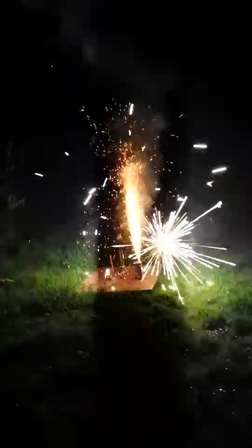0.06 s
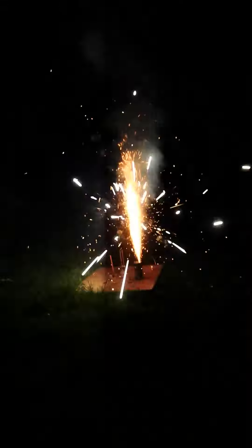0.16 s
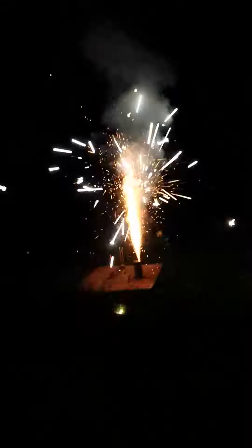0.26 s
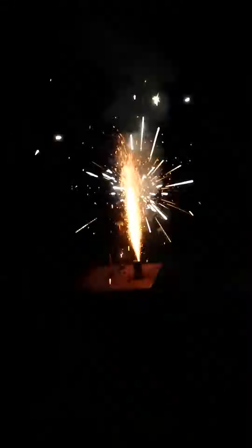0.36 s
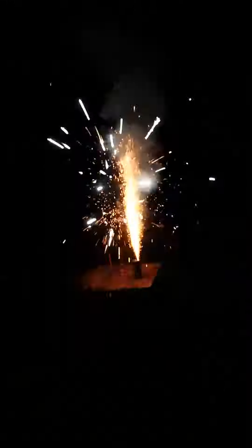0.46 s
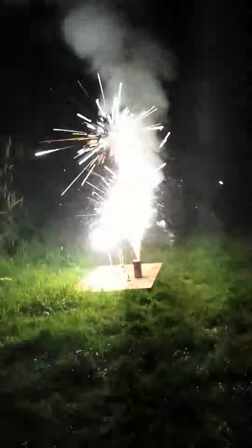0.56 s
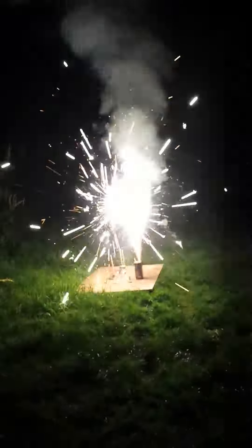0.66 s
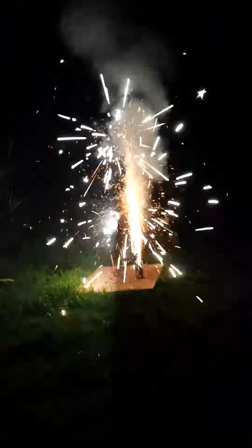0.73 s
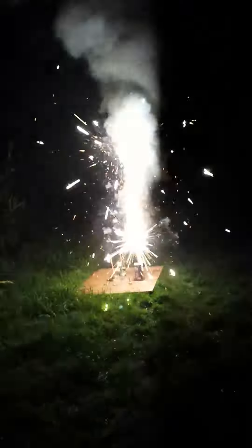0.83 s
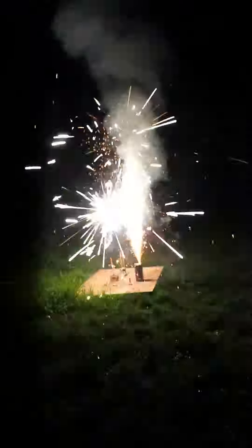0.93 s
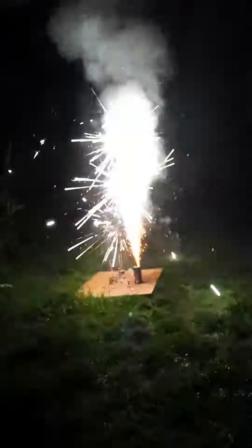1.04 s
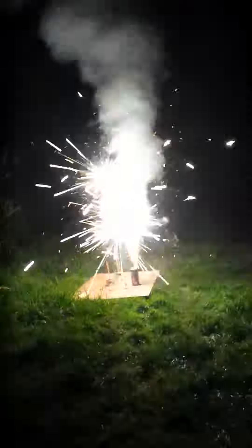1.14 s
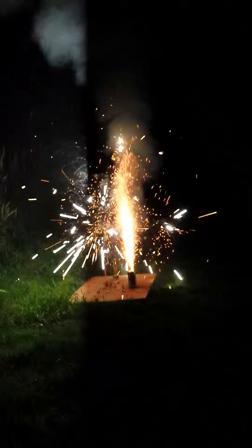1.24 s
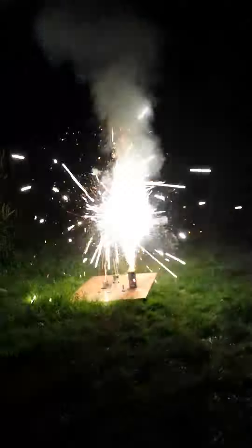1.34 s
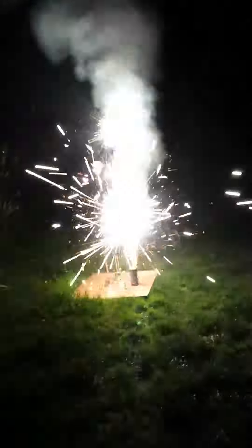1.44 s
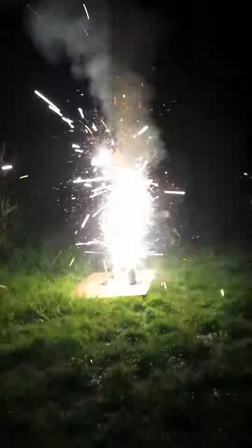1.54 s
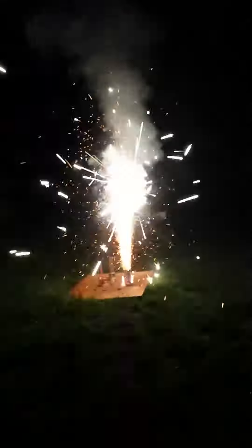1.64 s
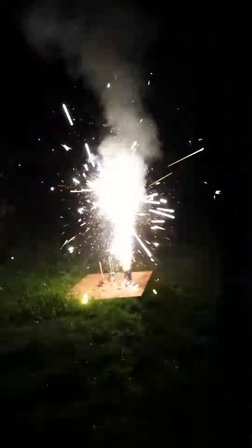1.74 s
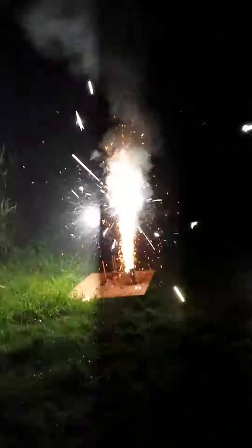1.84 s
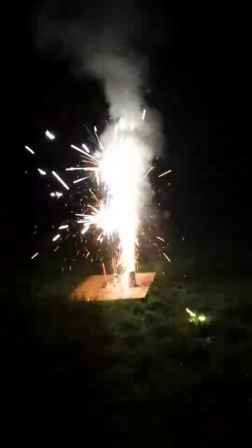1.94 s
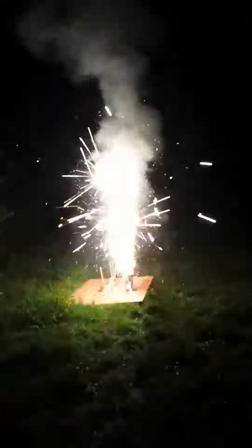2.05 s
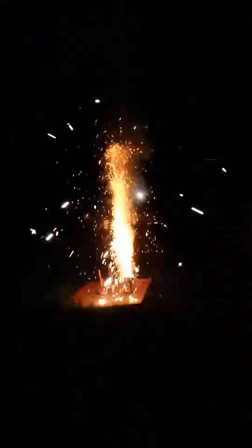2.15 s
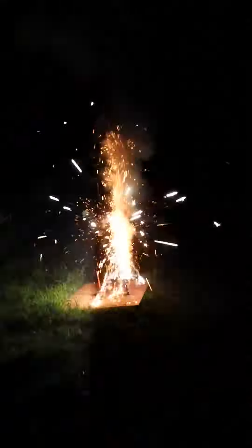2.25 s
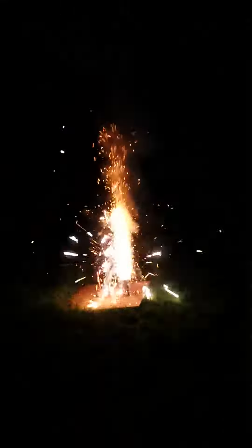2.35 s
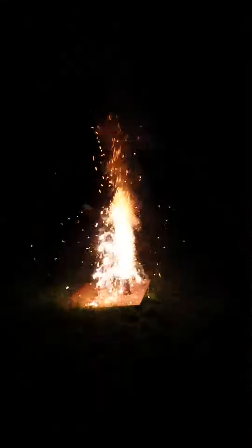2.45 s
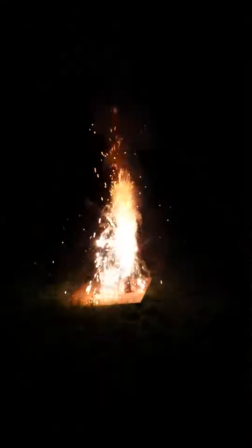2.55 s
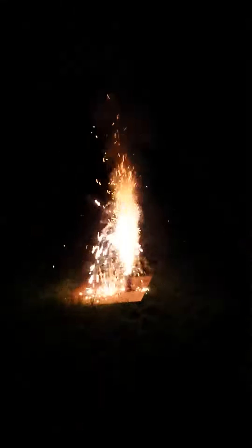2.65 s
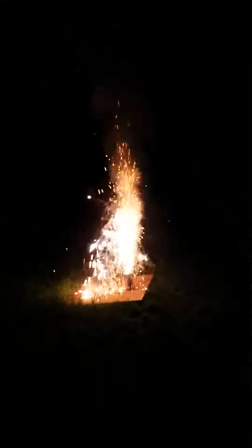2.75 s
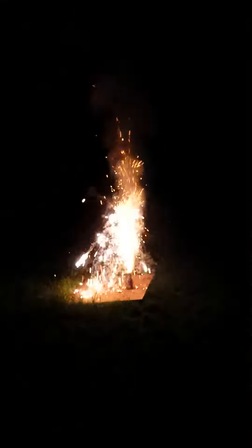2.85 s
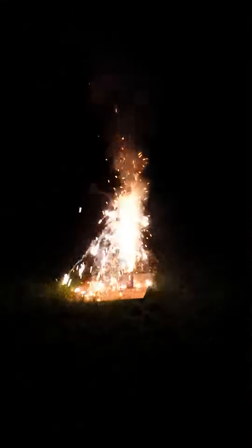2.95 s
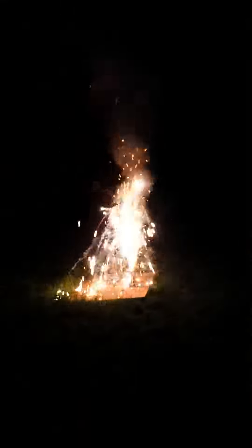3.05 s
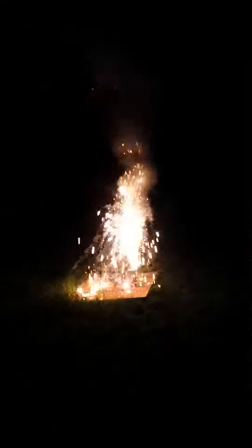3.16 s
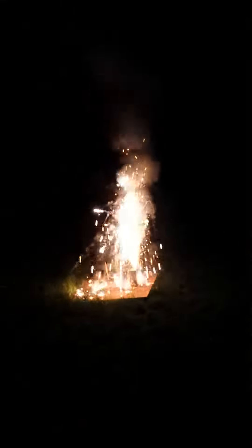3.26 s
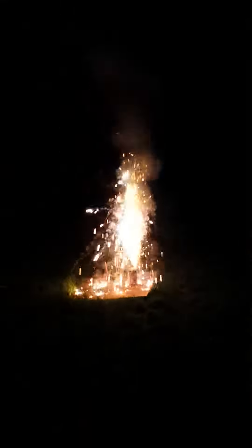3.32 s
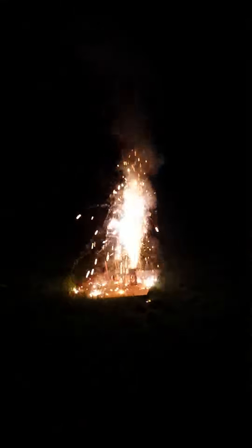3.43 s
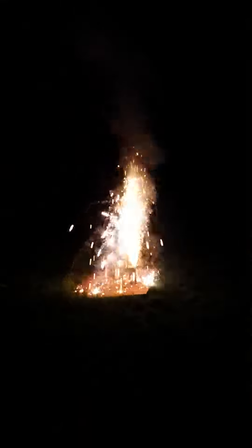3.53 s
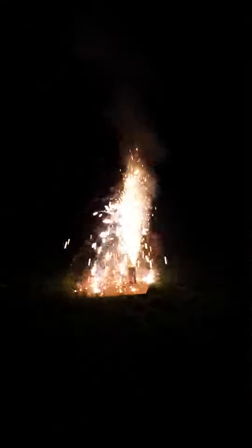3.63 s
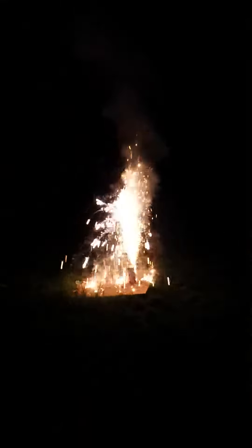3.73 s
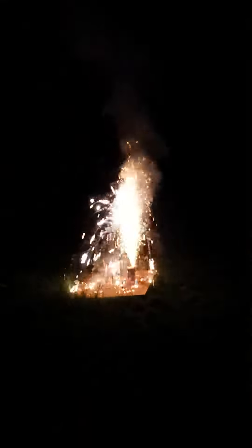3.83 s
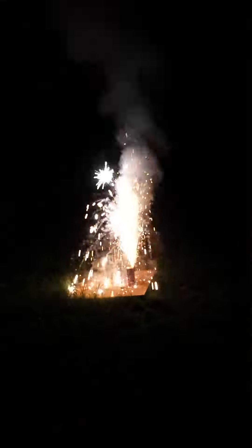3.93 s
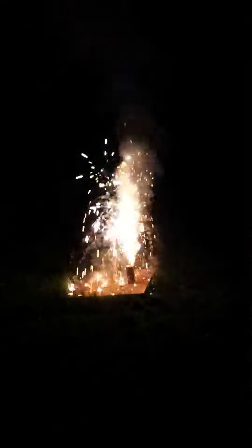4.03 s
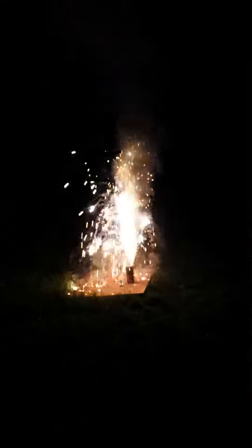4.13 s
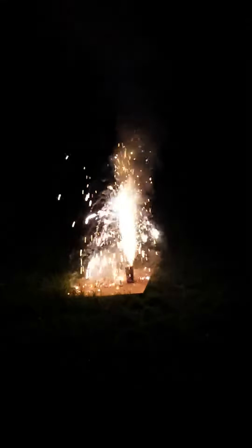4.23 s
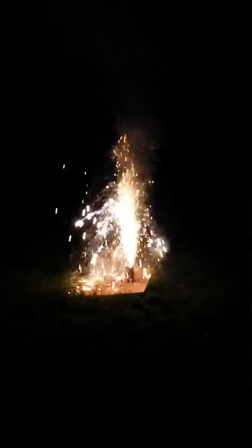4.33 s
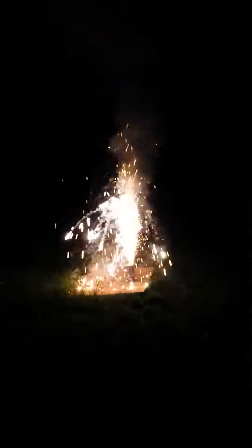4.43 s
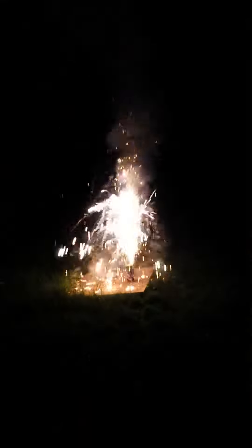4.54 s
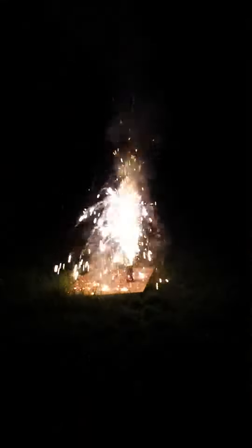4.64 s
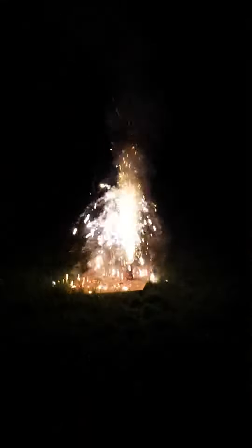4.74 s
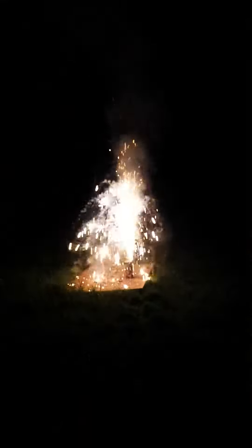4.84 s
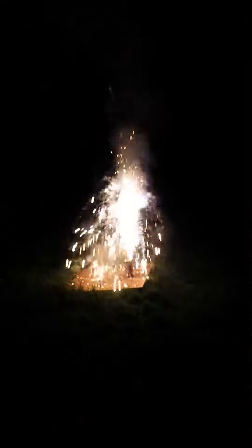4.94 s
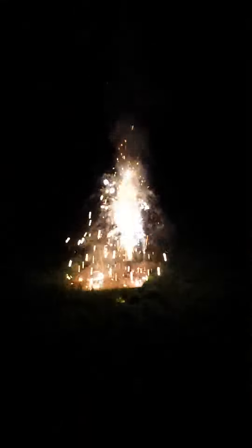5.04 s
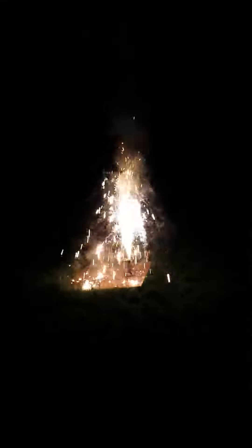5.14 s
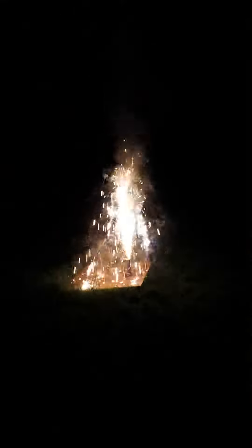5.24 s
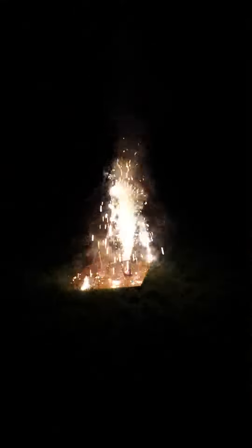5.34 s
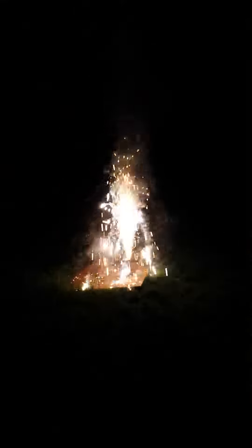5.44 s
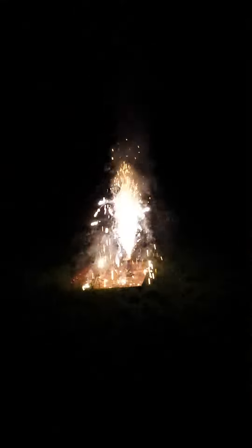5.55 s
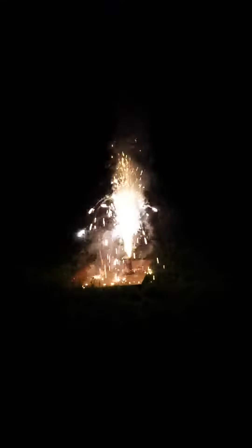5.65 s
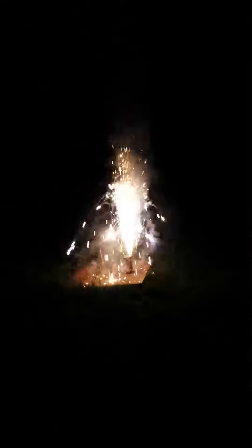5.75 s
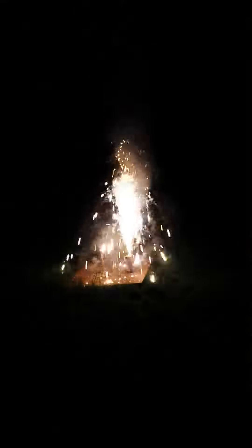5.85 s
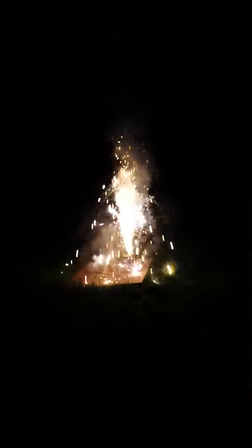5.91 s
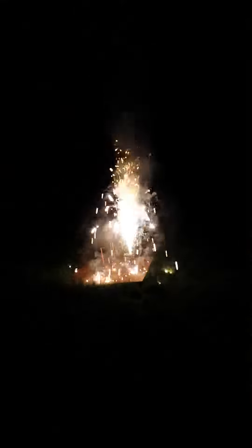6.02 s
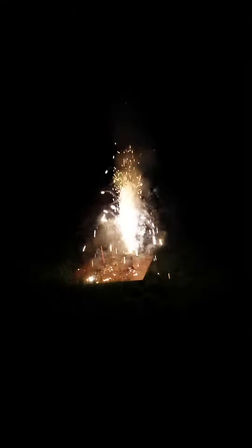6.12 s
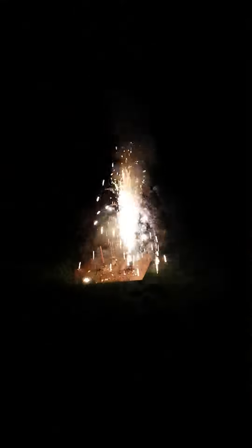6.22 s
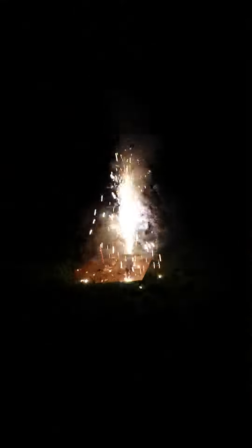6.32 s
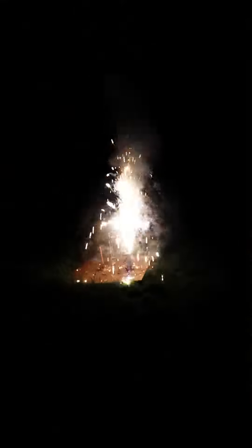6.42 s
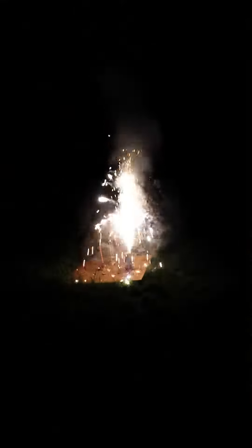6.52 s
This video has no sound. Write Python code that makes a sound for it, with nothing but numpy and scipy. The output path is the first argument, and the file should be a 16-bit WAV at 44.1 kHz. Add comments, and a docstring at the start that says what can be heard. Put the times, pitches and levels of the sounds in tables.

```python
"""A garden at night: a ground fountain firework burns on a board a few metres from a hand-held stereo microphone.
Crackling stars burst above it in quick volleys, each a tiny shock wave with scatter, then all but stop.
A quieter jet of sparks, made of shaped noise, builds up with a rumble, a rush and a hiss.
The nozzle sputters with dull pops, N-shaped pressure pulses, and a few hollow knocks ring among them.
Fences and walls return short echoes."""
import sys
import numpy as np
from scipy import signal
from scipy.fft import rfft, irfft
from scipy.io import wavfile

SR = 44100
rng = np.random.default_rng(int(sys.argv[2]) if len(sys.argv) > 2 else 0)


def digitize_waveform(pressure):
    """Quantize a signal to 16-bit integers and store it at the path in sys.argv[1].

    Rows of a 2-D input are taken as channels; values are limited to [-1, 1].
    """
    field = np.atleast_2d(pressure).T
    bounded = np.clip(field, -1, 1)
    quanta = np.round(bounded * 32767).astype(np.int16)
    wavfile.write(sys.argv[1], SR, quanta)


N = 290178
TIME = np.arange(N) / SR


def from_db(db):
    """Decibels to gain."""
    return 10 ** (np.asarray(db) / 20)


def rms_one(x):
    """Scale to unit power."""
    return x / np.sqrt(np.mean(x ** 2) + 1e-20)


def in_time(rows):
    """Interpolate each column after the first over time, which is the first column."""
    time_s, *columns = np.transpose(rows)
    return [np.interp(TIME, time_s, column) for column in columns]


def samples(ms):
    """Milliseconds to samples."""
    return ms * SR / 1000


def add(track, sound, start_s):
    """Mix a sound into a track at a time; it may have begun before the track does."""
    at = min(int(round(start_s * SR)), N - 1)
    sound = sound[..., max(-at, 0):]
    at = max(at, 0)
    track[..., at:at + sound.shape[-1]] += sound[..., :N - at]


def cut(x, hz, kind, order=2):
    """Butterworth low- or high-pass."""
    sections = signal.butter(order, min(hz, SR / 2 - 1), kind, fs=SR, output="sos")
    return signal.sosfilt(sections, x + 1e-18)


def coloured(x, spectrum, size=4096):
    """Causal (minimum-phase) filter through points of pitch_hz and level_db."""
    pitch_hz, level_db = np.transpose(spectrum)
    grid_hz = np.maximum(np.fft.rfftfreq(size, 1 / SR), 1)
    gain = from_db(np.interp(np.log(grid_hz), np.log(pitch_hz), level_db))
    # folding the cepstrum onto positive times makes the filter minimum-phase
    cepstrum = irfft(np.log(gain))
    cepstrum[1:size // 2] *= 2
    response = irfft(np.exp(rfft(cepstrum[:size // 2], size)))
    return signal.oaconvolve(x, response[None], axes=1)[:, :N]


def drift(rate_hz):
    """Random wander: straight lines between random knots of spread 1, rate_hz of them a second."""
    knots = rng.standard_normal(N // 20)
    return np.interp(TIME * rate_hz, np.arange(len(knots)), knots)


def stereo_noise(alike):
    """White noise, partly shared by both sides (alike: 0 to 1)."""
    share = np.clip(alike, 0, 1)
    common = np.sqrt(share) * rng.standard_normal(N)
    return common + np.sqrt(1 - share) * rng.standard_normal((2, N))


GARDEN_T60_S = 0.6


def garden(near_db, far_db, near_ms, size=22050):
    """Stereo scatter: a patch of sparse echoes from things close by, then a faint smooth tail."""
    n = np.arange(size)
    begun = 1 - np.exp(-(n / samples(2.2)) ** 2)
    # uneven random levels make the near echoes sparse
    sparse = rng.standard_normal((2, size)) * from_db(4.5 * rng.standard_normal(size))
    near = sparse * begun * np.exp(-(n / samples(near_ms)) ** 3)
    far = rng.standard_normal((2, size)) * begun * np.exp(-np.log(1000) * n / SR / GARDEN_T60_S)
    far = cut(rms_one(far), 18000, "low", order=1)
    left, right = from_db(near_db) * rms_one(near) + from_db(far_db) * far
    # long waves reach both ports alike
    mid = (left + right) / 2
    side = cut((left - right) / 2, 1060, "high", order=1)
    return np.array([mid + side, mid - side]) / np.sqrt(size)


# course of the jet: time_s, rush_db, hiss_db
JET_COURSE = [(2.619, -61.5, -62.5), (3.1, -60.3, -61.5), (3.28, -58, -58.5), (3.57, -48, -51.5),
              (3.9, -45, -47), (4.15, -41.5, -48.5), (4.7, -44.5, -48), (4.96, -44.5, -48),
              (5.28, -37.5, -40.5), (5.64, -39.5, -41.5), (5.86, -38.5, -46), (6.32, -37, -42),
              (6.58, -42, -46)]
# noise spectra of its three parts, relative levels: pitch_hz, level_db (per Hz)
RUMBLE_COLOUR = [(20, -28), (45, -13), (75, -1), (140, 2.5), (190, -2), (290, 1.5), (400, 0), (600, -11.5),
                 (1100, -35), (2000, -68.5)]
RUSH_COLOUR = [(250, -11), (500, 3), (800, 1.5), (1200, -0.5), (1720, -1.5), (2150, -12), (3500, -41)]
HISS_COLOUR = [(1500, -6.5), (2800, 3.5), (3850, 2), (4150, -6.5), (4800, -1.5), (5700, -4.5), (8000, -4),
               (11000, -8.5), (14500, -16.5)]
# the rumble follows the rush: its level when the rush curve is at FULL_JET_DB, and dB gained per dB of rush
FULL_JET_DB, RUMBLE_DB, RUMBLE_FOLLOWS = -40, -37, 0.97


def jet():
    """Turbulent gas rumbles in lumps, rushes and hisses; the uneven burn makes it flutter."""
    rush_db, hiss_db = in_time(JET_COURSE)
    rumble_db = RUMBLE_DB + RUMBLE_FOLLOWS * (rush_db - FULL_JET_DB)
    flutter = drift(45)   # shared by rush and hiss
    rumble_gain = from_db(rumble_db + 4.0 * drift(30))
    rush_gain = from_db(rush_db + 1.0 + 1.85 * flutter)
    hiss_gain = from_db(hiss_db + 1.03 * flutter + 1.37 * drift(400))
    # low sound is nearly the same at both ports, the hiss hardly at all
    rumble = rms_one(coloured(stereo_noise(0.99), RUMBLE_COLOUR)) * rumble_gain
    rush = rms_one(coloured(stereo_noise(0.58), RUSH_COLOUR)) * rush_gain
    hiss = rms_one(coloured(stereo_noise(0.055), HISS_COLOUR)) * hiss_gain
    return rumble + rush + hiss


# hollow knocks, perhaps slag landing on the board: start_s, level_db, pitch_hz, t60_s
SLAG_KNOCKS = [(2.777, -39.5, 680, 0.016), (3.8225, -8.5, 775, 0.022), (5.724, -21, 850, 0.02)]


def knocks():
    """Each knock is a decaying sine at one pitch and scatters a little."""
    direct, t = np.zeros(N), TIME[:SR // 5]
    for start_s, level_db, pitch_hz, t60_s in SLAG_KNOCKS:
        ring = np.sin(2 * np.pi * pitch_hz * t) * np.exp(-np.log(1000) * t / t60_s)
        add(direct, from_db(level_db) * ring, start_s)
    scatter = garden(near_db=-9, far_db=-16, near_ms=30)
    return direct + signal.oaconvolve(direct[None], scatter, axes=1)[:, :N]


LINGER_HZ, LINGER_WIDTH_HZ = 1780, 270


def linger(x):
    """All-pass: one band rings on a moment, the colour stays."""
    b, a = signal.iirpeak(LINGER_HZ, LINGER_HZ / LINGER_WIDTH_HZ, fs=SR)
    return x - 2 * signal.lfilter(b, a, x)


# gas pops at the nozzle: start_s, level_db (relative), length_ms of the pulse
NOZZLE_POPS = [(2.888, -26.5, 1.6), (2.909, -36, 1.07), (3.036, -36, 4.8), (3.081, -13.5, 2.23),
               (3.1405, -12.5, 2.46), (3.245, -11, 2.22), (3.366, -20, 0.92), (3.372, -8.5, 1.85),
               (3.403, -10, 2.45), (3.688, -21, 5.4), (3.723, -20, 6.3), (3.823, -16, 0.97),
               (3.963, -2, 2.65), (3.982, -13.5, 0.64), (3.985, -6.5, 4), (4.415, -15.5, 2.85),
               (4.502, -13, 4.8), (4.508, -20, 1.5), (4.572, -20, 1.6), (4.627, -19.5, 2.3),
               (5.042, -8, 3.1), (5.257, -10, 3.33), (5.266, -1, 3.17), (5.323, -17, 1.95),
               (5.551, -11.5, 4.4), (5.723, -21, 1.7), (5.82, -2, 1.89), (5.912, -2.2, 1.88),
               (5.955, -1.5, 2.23), (5.9605, -5.5, 1.5), (5.9686, -7.5, 1.8), (6.0806, -3.5, 2.96),
               (6.094, -2, 1.7), (6.55, -9, 4.9)]
# what the tube and board make of a pop: pitch_hz, level_db
TUBE_AND_BOARD_COLOUR = [(40, 2), (90, -7.5), (150, -2.5), (200, -6), (280, 1.5), (390, 0.5), (540, 0.5),
                         (800, 3.5), (1200, 0.5), (1900, 2), (2500, 1), (4000, 5), (8000, -18)]
# echoes of the pops from fences and walls: delay_ms, level_db
WALL_ECHOES = [(8.4, -9.5), (10.9, -9), (16.2, -23.5), (20.0, -11), (22.2, -9.5), (24.4, -16.5),
               (27.4, -12.5), (31.8, -10.5)]
ECHO_DULL_HZ = 2270   # echoes come back duller
# short pops have a sharp front and a wide range; those longer than about SOFT_FROM_MS are soft, narrow puffs
SOFT_FROM_MS, SOFTENING_MS = 2.747, 0.22
SHARP_BAND_HZ, SOFT_BAND_HZ = np.array((89, 1650)), np.array((167, 282))


def pops(level_db, rounding):
    """Each pop is an N-shaped pressure pulse, sharp in front and rounded behind; all share the same echoes."""
    direct, n = np.zeros(N), np.arange(SR // 20)
    for start_s, pop_db, length_ms in NOZZLE_POPS:
        sharpness = (1 - np.tanh((length_ms - SOFT_FROM_MS) / SOFTENING_MS)) / 2
        low_hz, bright_hz = sharpness * SHARP_BAND_HZ + (1 - sharpness) * SOFT_BAND_HZ
        phase = n / samples(length_ms)
        pulse = (1 - 2 * phase) * (1 - np.tanh((phase - 1) / rounding))
        pulse = cut(cut(pulse, low_hz, "high"), bright_hz, "low")
        pulse = cut(pulse, 2 * bright_hz ** 2 / 600, "low")   # softens the front of slow puffs further
        add(direct, from_db(pop_db + level_db) * pulse / np.abs(pulse).max(), start_s)
    scatter = garden(near_db=-3, far_db=-7, near_ms=44)
    out = direct + signal.oaconvolve(direct[None], scatter, axes=1)[:, :N]
    echo = cut(direct, ECHO_DULL_HZ, "low", order=1)
    for delay_ms, echo_db in WALL_ECHOES:
        add(out, from_db(echo_db) * echo, delay_ms / 1000)
    return linger(coloured(out, TUBE_AND_BOARD_COLOUR))


def shock(hand_db, width_ms, size=256):
    """One star's tiny shock wave; on the left it also glances off the hand that holds the microphone."""
    paths, n = np.zeros((2, size)), np.arange(size)
    # the front reaches the left port a few samples late and weaker
    paths[0, rng.integers(4, 8)] = from_db(-4.0)
    paths[1, 0] = from_db(1.5)
    # two glancing reflections, the second twice as late
    lag = int(samples(rng.uniform(.6, 1.2)))
    glance_db = hand_db + np.array([0, -8.0]) + 3.4 * rng.standard_normal(2)
    paths[0, [lag, 2 * lag]] += from_db(glance_db)
    paths += from_db(-14.5) * rng.standard_normal((2, size)) * np.exp(-n / samples(1.73))
    # each arrival decays over width_ms
    wave = signal.lfilter([1], [1, -np.exp(-1 / samples(width_ms))], paths)
    return rms_one(wave) / np.sqrt(size)


# the big stars: start_s, level_db (strength)
BIG_STARS = [(-0.004, 10.5), (0.0415, 16.5), (0.0863, 10), (0.1257, 13), (0.1839, 3), (0.197, -1),
             (0.2092, 9), (0.2343, 14.5), (0.3345, 13.5), (0.405, 2.5), (0.4136, -1.5), (0.423, 15),
             (0.5416, 17), (0.573, 16.5), (0.5833, 11), (0.6178, 11), (0.6233, 12.5), (0.6325, 6),
             (0.6496, 8), (0.6678, 10.5), (0.6825, 1), (0.6978, 15.5), (0.75, 10.5), (0.8303, 4),
             (0.8459, 14.5), (0.8999, 9.5), (0.9046, 8), (0.9257, 16), (0.9676, 2.5), (1.0095, 0),
             (1.0219, 14), (1.031, 15), (1.0882, 6.5), (1.1099, 7.5), (1.117, 13), (1.1282, 14.5),
             (1.1675, 4.0), (1.198, 5), (1.2551, 16), (1.28, 2), (1.298, 7.5), (1.3083, 15), (1.3351, 9),
             (1.3655, -2), (1.3896, 12.5), (1.3983, 6), (1.4175, 16.5), (1.4479, 5.5), (1.4815, 14.5),
             (1.5338, 16), (1.5525, 10.5), (1.581, 14.5), (1.6235, 7.5), (1.6777, 18), (1.74, 10),
             (1.7491, 7.5), (1.8045, 7), (1.8444, 5), (1.8543, 19), (1.8929, 8.5), (1.9275, 12.5),
             (1.991, 12.0), (2.0351, 11.5), (2.057, 2), (2.0692, 15), (2.1995, 6.5), (2.2066, 9.5),
             (2.2168, 11.0), (2.2881, 13.5), (2.3149, 1.5), (2.5381, -4), (3.935, -9.5), (4.5083, -15)]
# how thickly small stars pop among them: time_s, bursts_per_s
SMALL_STAR_RATE = [(0, 80), (.27, 45), (.3, 1), (.53, 1), (.56, 80), (.73, 60), (.8, 3), (1.02, 15),
                   (1.3, 70), (2.08, 55), (2.14, 5)]
# spectrum of the bursts: pitch_hz, level_db
BURST_COLOUR = [(25, -17), (60, -14), (140, -6), (300, -4), (480, -1.5), (750, 1.5), (1500, 0), (3000, -2),
                (6000, 0), (10000, -1), (14000, -11.5)]
# a star's scatter follows its strength; its shock front levels off towards a ceiling
FRONT_DB, FRONT_CEILING_DB, SCATTER_DB = 5, 14, -3.5
# small stars are mostly faint; louder ones get rarer and rarer
SMALL_FAINTEST_DB, SMALL_SPREAD_DB, SMALL_LOUDEST_DB = -8.5, 6, 3


def crackle():
    """Big stars burst in volleys, each with its own scatter; small ones pop at random between them."""
    out = np.zeros((2, N))
    for start_s, level_db in BIG_STARS:
        star_size = from_db(2 * rng.standard_normal())   # bigger stars sound duller
        front = 1 / (1 / from_db(level_db + FRONT_DB) + 1 / from_db(FRONT_CEILING_DB))
        add(out, front * shock(hand_db=-1.5, width_ms=.007 * star_size), start_s)
        scatter = garden(near_db=0.0, far_db=-7.0, near_ms=35)
        scatter = cut(scatter, 10500 / star_size, "low")
        add(out, from_db(level_db + SCATTER_DB) * scatter, start_s)
    bursts_per_s, = in_time(SMALL_STAR_RATE)
    burning = TIME < SMALL_STAR_RATE[-1][0]
    bursts = burning & (rng.random(N) < bursts_per_s / SR)
    for start_s in TIME[bursts]:
        small_db = min(SMALL_FAINTEST_DB + SMALL_SPREAD_DB * rng.exponential(), SMALL_LOUDEST_DB)
        add(out, from_db(small_db) * shock(hand_db=-1.5, width_ms=0.013), start_s)
    return coloured(out, BURST_COLOUR)


def scene():
    """Stars burst; the sounds of the nozzle reach the right port a moment before the left."""
    nozzle = pops(level_db=-2.0, rounding=0.15) + knocks() + jet()
    nozzle[0] = np.interp(np.arange(N) - 5, np.arange(N), nozzle[0])   # left is 5 samples late
    return crackle() + nozzle


# resonances of a hollow at the left microphone port: pitch_hz, width_hz, level_db
LEFT_PORT_MODES = [(326, 140, -8.5), (1150, 570, -48), (1785, 520, 3.5), (2960, 450, -6), (3714, 425, 7.5),
                   (5486, 1030, 9.5), (12500, 7200, 3)]
PORT_DULL_HZ = 8050


def left_port(x):
    """The left port is duller on top, and a hollow beside it rings."""
    out = cut(x, PORT_DULL_HZ, "low", order=1)
    for pitch_hz, width_hz, level_db in LEFT_PORT_MODES:
        b, a = signal.iirpeak(pitch_hz, pitch_hz / width_hz, fs=SR)
        out = out + from_db(level_db) * signal.lfilter(b, a, x)
    return cut(out, 5420, "low", order=1)


CUTOFF_HZ = 14900


def record(dry):
    """Two unlike ports; the sharpest peaks overload and round off; the top is cut steeply."""
    ports = np.array([from_db(1.51) * left_port(dry[0]), from_db(0.13) * dry[1]])
    rounded = ports / (1 + (ports / .92) ** 4) ** (1 / 4)
    top_cut = signal.ellip(10, .2, 80, CUTOFF_HZ, fs=SR, output="sos")
    return signal.sosfilt(top_cut, rounded)


dry = scene()
out = record(dry)
digitize_waveform(out)
```